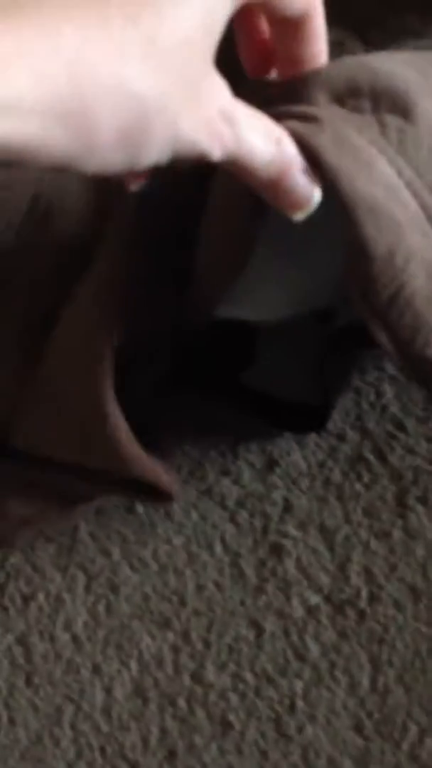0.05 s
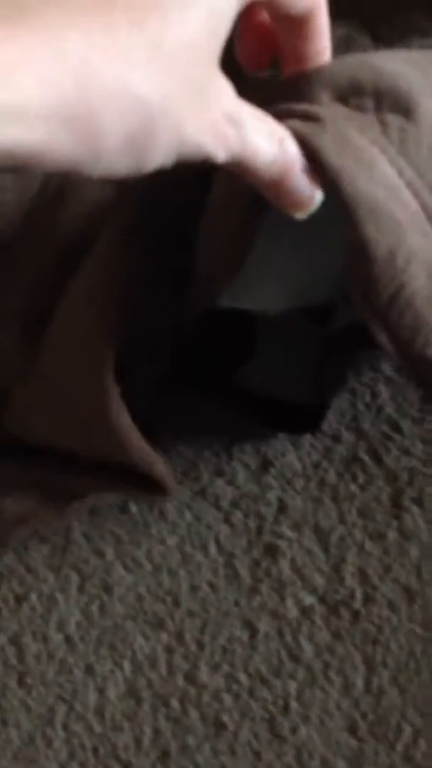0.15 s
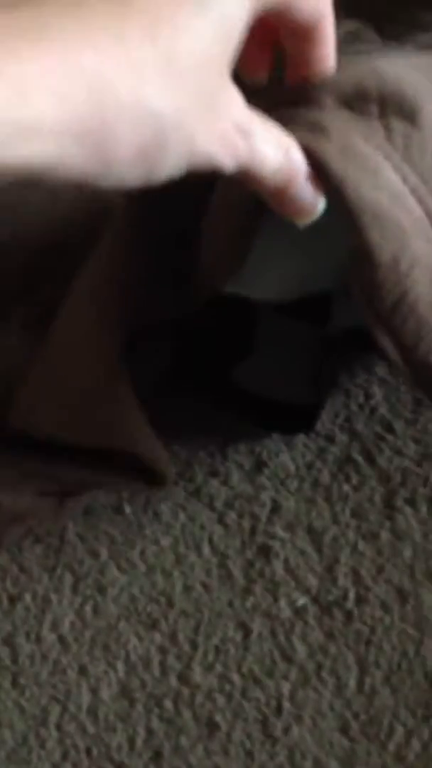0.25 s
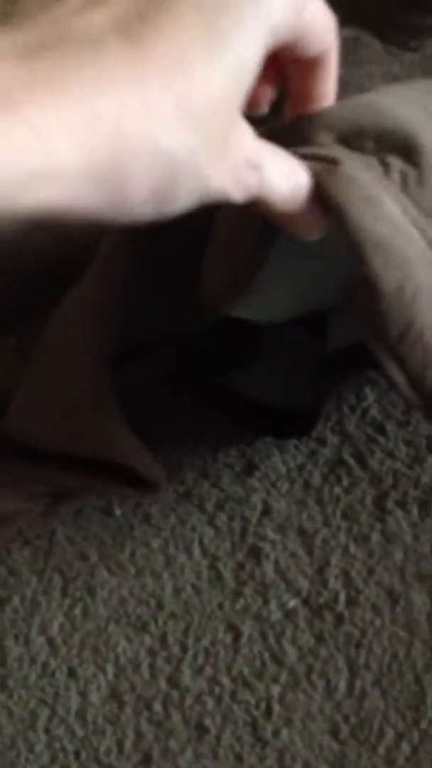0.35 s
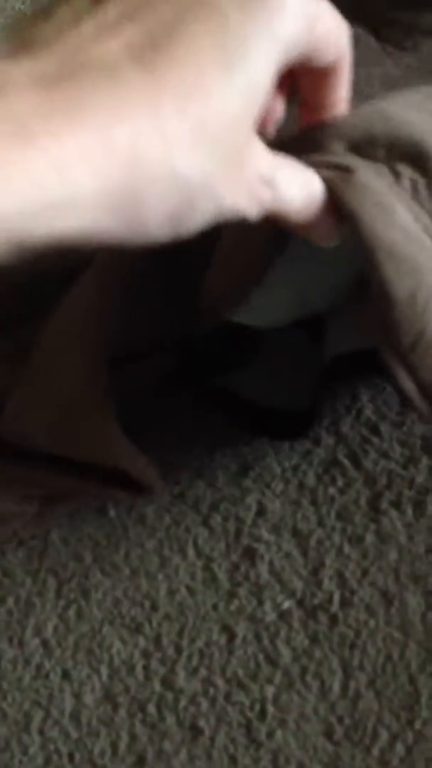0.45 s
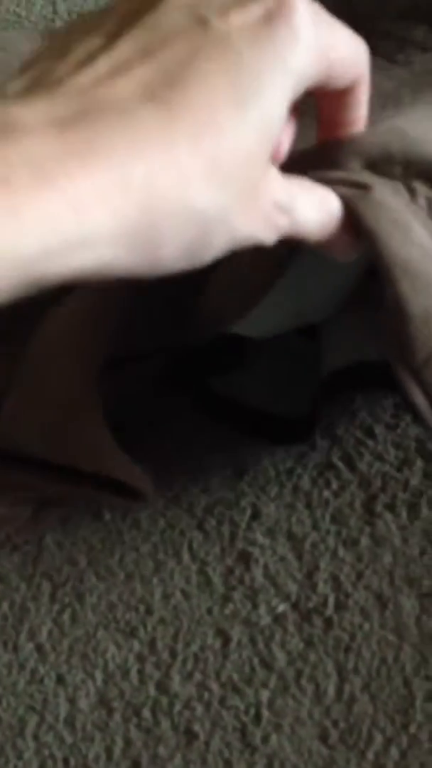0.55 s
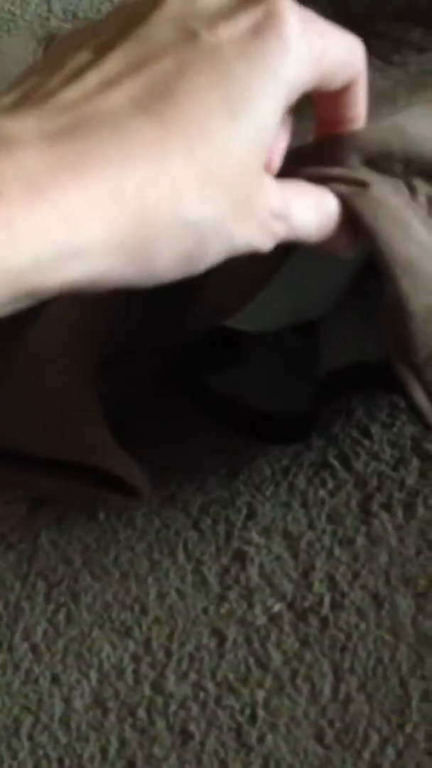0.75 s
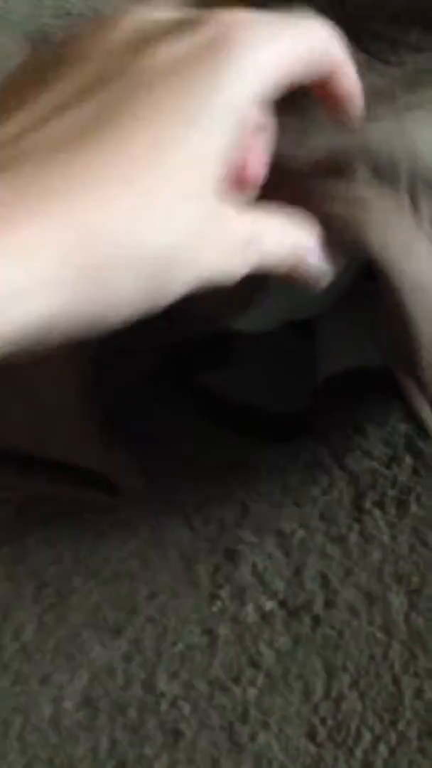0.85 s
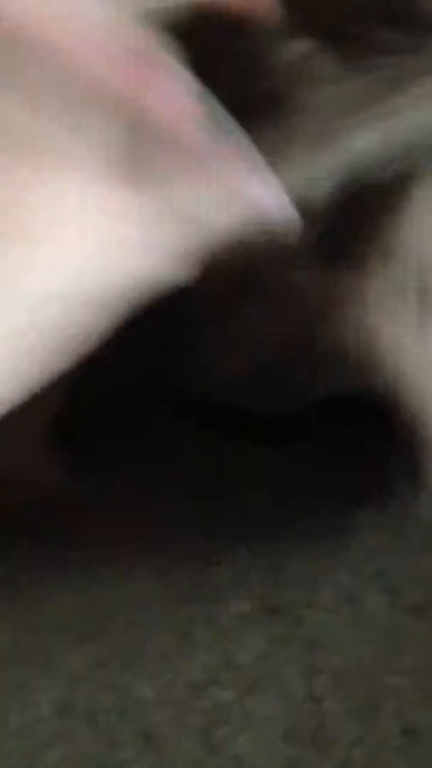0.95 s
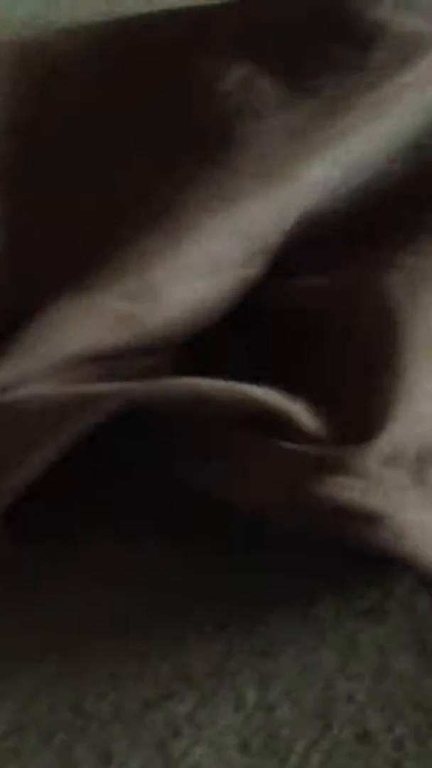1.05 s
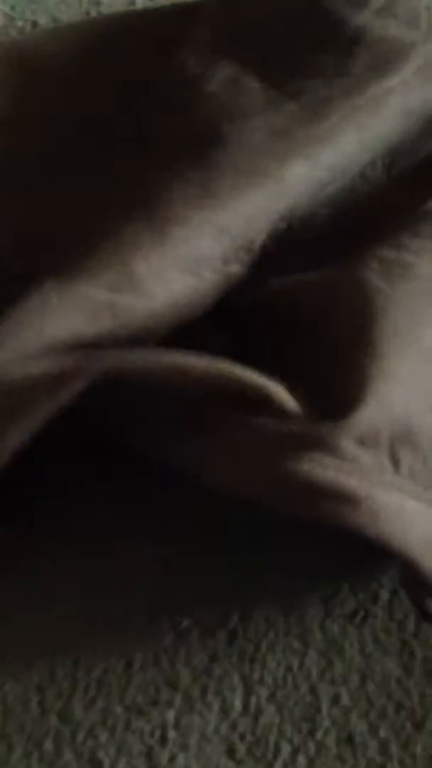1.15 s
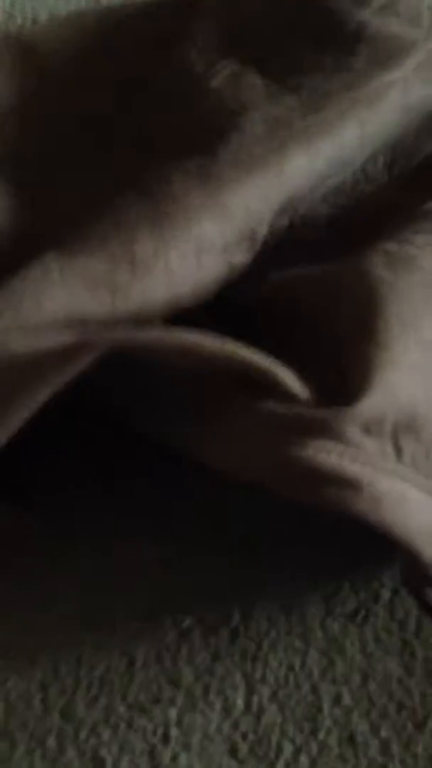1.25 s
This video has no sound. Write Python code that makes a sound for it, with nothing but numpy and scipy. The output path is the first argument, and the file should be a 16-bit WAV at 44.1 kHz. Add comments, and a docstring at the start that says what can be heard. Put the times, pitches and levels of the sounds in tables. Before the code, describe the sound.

High, short cries from a small animal come one after another indoors, loudest at first, then fainter and raspier. Each rings slightly in the room, over soft padded thuds, a light cloth brush and a low hum.

```python
"""Small animal under a cloth

A ferret-like animal cries six times: a high, clean stack of harmonics, shaped by its throat,
that cracks upward or turns hoarse before it sinks away. The room rings after each cry.
Underneath lie soft bumps and thuds, thin squeaks, a brush of cloth, room tone and mains hum."""
import sys
import numpy as np
from scipy import signal
from scipy.fft import rfft, irfft
from scipy.io import wavfile

SR = 44100
rng = np.random.default_rng(int(sys.argv[2]) if len(sys.argv) > 2 else 0)


def to_wav(sig):
    """Store sig (one row per channel, or 1-D mono) as 16-bit WAV at the path in sys.argv[1].

    Samples outside -1..1 are clipped; the rate is SR.
    """
    pcm = np.clip(np.atleast_2d(sig), -1, 1) * 32767
    pcm = np.round(pcm).astype(np.int16)
    wavfile.write(sys.argv[1], SR, pcm.T)  # frames by channels


N = 57330
TIME = np.arange(N) / SR


def amp(db):
    """Decibels to gain."""
    return 10 ** (np.asarray(db) / 20)


def curve_at(points, hz):
    """Reads a curve along a log-frequency axis."""
    f, value = np.transpose(points)
    return np.interp(np.log(hz + 1), np.log(f + 1), value)


def noise(eq):
    """White noise coloured by the gain eq(f), at an rms of one."""
    x = irfft(rfft(rng.standard_normal(N)) * eq(np.fft.rfftfreq(N, 1 / SR)), N)
    return x / np.sqrt(np.mean(x ** 2) + 1e-20)


def noise_band(centre_hz, octaves):
    """Noise through a bell-shaped band."""
    return noise(lambda f: np.exp(-.5 * (np.log2((f + 1) / centre_hz) / octaves) ** 2))


def wobble(rate_hz):
    """A random modulator that rolls off above the given rate."""
    return noise(lambda f: np.exp(-.5 * (f / rate_hz) ** 2))


def swell(start, length):
    """A half-sine fade in and out."""
    return np.sin(np.pi * np.clip((TIME - start) / length, 0, 1))


def padded_hits(hits, decay_s, octaves, attack_s=0.0019):
    """Cushioned blows: each a fast-damped burst of noise around one pitch."""
    out = np.zeros(N)
    for start, db, hz in hits:
        age = np.maximum(TIME - start, 0)
        envelope = np.minimum(age / attack_s, 1) * np.exp(-np.maximum(age - attack_s, 0) / decay_s)
        out += amp(db) * noise_band(hz, octaves) * envelope
    return out


# Room tone EQ: f/Hz, relative level/dB
ROOM_TONE_EQ = [(15, -52), (30, -14), (50, -11), (75, -1.5), (150, -2), (230, -5.5), (380, -9.5),
                (520, -13), (850, -15), (1200, -17.5), (2100, -22.5), (2900, -17), (3260, -21.5),
                (4260, -19.5), (7500, -24.5), (15000, -29.5)]

def room_tone(bed_db=-60, hum_db=-57, hum_hz=120):
    """A steady, bass-heavy noise bed with mains hum."""
    bed = noise(lambda f: amp(curve_at(ROOM_TONE_EQ, f)))
    hum = np.sqrt(2) * np.sin(2 * np.pi * hum_hz * TIME)
    return amp(bed_db) * bed + amp(hum_db) * hum


# Thud cues: t/s, level/dB, f/Hz
THUD_CUES = [(0.0, -45.5, 265), (.165, -54, 297), (.235, -56.5, 362), (.306, -44.5, 353),
             (.512, -54.5, 359), (.783, -54.5, 345), (.918, -50.5, 314), (1.116, -47, 302)]

def thuds():
    """Dull, padded blows in the low mids."""
    return padded_hits(THUD_CUES, decay_s=0.0085, octaves=0.32)


# Squeak cues: t/s, length/s, level/dB, start f/Hz, end f/Hz
SQUEAK_CUES = [(.005, 0.055, -63.5, 3170, 3330), (0.103, 0.043, -60, 3650, 3900),
               (0.22, 0.029, -50.5, 2310, 2480)]

def squeaks(waver=0.03, waver_hz=200):
    """Faint, wavering whistles that glide upward and lead into the first cry."""
    out = np.zeros(N)
    for start, length, db, from_hz, to_hz in SQUEAK_CUES:
        glide = np.interp(TIME, [start, start + length], [from_hz, to_hz])
        hz = glide * (1 + waver * wobble(waver_hz))
        out += amp(db) * swell(start, length) * np.sin(2 * np.pi * np.cumsum(hz) / SR)
    return out


# Cloth cue: t/s, length/s, level/dB, centre f/Hz, width/octaves
CLOTH_CUES = [(0.093, 0.046, -60, 5300, 0.28)]

def cloth():
    """Cloth slides with a short, soft hiss."""
    return sum(amp(db) * swell(start, length) ** 2 * noise_band(hz, octaves)
               for start, length, db, hz, octaves in CLOTH_CUES)


# Bump cues: t/s, level/dB, f/Hz
BUMP_CUES = [(.156, -53, 830), (.170, -54.5, 730), (.262, -45, 777), (.303, -56, 690), (.510, -55, 826),
             (.774, -46.5, 750), (.786, -52.5, 840), (.911, -40.5, 794), (.919, -45.5, 910),
             (1.107, -47.5, 726)]

def bumps():
    """Soft blows, higher and a little longer than the thuds."""
    return padded_hits(BUMP_CUES, decay_s=0.013, octaves=0.22)


# Formants of throat and mouth: f/Hz, gain/dB
THROAT_EQ = [(600, -48), (980, -39), (1220, -6.5), (1700, -11), (1950, -22), (2370, -0.5), (2800, 3),
             (3400, -4), (3650, -6.5), (3950, -0.5), (4300, -7.5), (4550, -5), (4950, -10), (5350, -12),
             (5950, -21), (6400, -19.5), (7300, -19), (8000, -31.5), (9300, -28), (10800, -32),
             (12000, -42), (15500, -47)]
# Automation, one list of breakpoints per cry:
# t/s, pitch/Hz, pre-EQ level/dB, fundamental lift/dB, treble lift/dB, edge lift/dB, roughness/0-1
CRY_CURVES = [
    [(.234, 1180, -32, 5.5, -15, -24, 0.08), (.245, 1200, -29, 0, 1.5, -2.5, 0.1),
     (.268, 1241, -30.5, -0.5, -0.5, 9, 0.06), (.285, 1219, -32.5, 2.5, -2, 5.5, 0),
     (.304, 1301, -31.5, 0, 5, 6, 0.1), (.315, 1431, -34.5, 11, 10, 11.5, 0),
     (.324, 1433, -28.5, -0.5, 8, 6.5, 0.1), (.335, 1383, -25.5, -2.5, 8, 6, 0.13),
     (.338, 1481, -25.5, 1.5, 6, 7, 0), (.347, 1639, -25.5, 6.5, -3.5, 0, 0.41),
     (.354, 1758, -20.5, 5.5, 0.5, 0.5, 0.24), (.360, 1636, -26.5, -13, -11, -15, 0.05),
     (.366, 1330, -41, 3, -22, -1, 0)],
    [(.454, 1289, -27, -11, 0, -1, 0.1), (.460, 1223, -26.5, -9, 14, -5.5, 0.07),
     (.467, 1278, -23.5, -8.5, 3.5, 3, 0), (.473, 1405, -24.5, -5, 1, -3, 0.36),
     (.477, 1413, -21.5, -10, -11, -7.5, 0.08), (.485, 1324, -24, -10, 0.5, 3.5, 0),
     (.5125, 1292, -22, -16, 4, -8.5, 0.03), (.515, 1687, -21.5, 2, -7, -11, 0.17),
     (.522, 1676, -14.5, -6.5, -4.5, -18, 0.07), (.536, 1643, -20, -15, -19, -17, 0),
     (.546, 1330, -50, 14, -7, 0, 0.3)],
    [(.627, 1205, -31, -12, -9, -7, 0.04), (.636, 1171, -22, -8, -16, -19.5, 0),
     (.645, 1190, -37.5, 3.5, -2, 6, 0), (.649, 1520, -31.5, -7, -9, -8, 0.45),
     (.657, 1520, -39.5, -10, -3, 2, 0.04), (.665, 1354, -47, 15.5, -23, 5, 0.26),
     (.676, 1205, -47.5, 1, 6, 4, 0.6)],
    [(.789, 1261, -32, -6, -8, -14, 0.18), (.801, 1224, -35, -38, 8.5, -25, 0),
     (.812, 1241, -30, -7, 1.5, -14, 0), (.823, 1324, -32, -11.5, -8.5, -9, 0.08),
     (.837, 1240, -34, -8.5, 0, -10, 0.07), (.856, 1363, -32, -1, -2, -3.5, .05),
     (.873, 1333, -37, -5.5, 5, -1, 0.17), (.883, 1492, -37.5, 7.5, 2, -8, 0.21),
     (.897, 1395, -37, -6.5, -2, -15, 0.58), (.920, 1456, -42, 11, -4, -3, 0.34),
     (.938, 1489, -43, 2, -1.5, -1, 0), (.956, 1462, -37.5, 9.5, -3.5, -3, 0.09),
     (.968, 1409, -48, 8.5, 0, 5.5, 0.15), (.979, 1220, -51, 19, -3, -4, 0.4)],
    [(1.138, 1178, -34.5, 6.5, -6, -22, 0.29), (1.144, 1179, -32.5, -3, -4.5, -21, 0.11),
     (1.153, 1210, -42, 13, 3, -8, 0.14), (1.159, 1065, -51.5, 30, -8, 0, 0),
     (1.168, 900, -46, 39, -12, 3, 0.3)],
    [(1.293, 1385, -46, 12, 1, -4, .45), (1.305, 1360, -41.5, 9, -29, -12, 0.42)],
]

def cry(curve, attack_s=0.0011, release_s=0.0022):
    """Vocal folds sound harmonics through the throat; roughness shakes their pitch and strength."""
    times, *lanes = np.transpose(curve)
    on = (TIME >= times[0]) & (TIME <= times[-1])
    t = TIME[on]
    pitch, db, fundamental_db, treble_db, edge_db, rough = (np.interp(t, times, v) for v in lanes)
    jitter = (0.0034 + 0.068 * rough) * wobble(rate_hz=390)[on]
    phase = 2 * np.pi * np.cumsum(pitch * (1 + jitter)) / SR
    harmonic = np.arange(1, 14)[:, None]
    hz = harmonic * pitch
    # The treble band crossfades into a shrill edge, which rolls off over about an octave.
    treble = np.interp(hz, [2550, 4450, 4800, 5400], [0, 1, 1, 0])
    edge = np.interp(hz, [4800, 5400], [0, 1]) * np.exp(-.5 * np.log2(hz / 5400) ** 2)
    lift_db = fundamental_db * (harmonic == 1) + treble_db * treble + edge_db * edge
    gains = amp(curve_at(THROAT_EQ, hz) + lift_db) * (hz < SR / 2)
    shimmer = 0.58 * rough * wobble(rate_hz=586.8)[on]
    voice = np.sqrt(2) * (gains * np.sin(harmonic * phase)).sum(0) * (1 + shimmer)
    breath_gain = amp(-24) + amp(2.5) * rough ** 1.26  # a little air always, rasp when hoarse
    breath = breath_gain * noise(lambda f: amp(curve_at(THROAT_EQ, f)))[on]
    gate = np.clip((t - times[0]) / attack_s, 0, 1) * np.clip((times[-1] - t) / release_s, 0, 1)
    out = np.zeros(N)
    out[on] = (voice + breath) * amp(db) * gate
    low_cut = signal.butter(4, 860, "high", fs=SR, output="sos")  # a small mouth radiates few lows
    return signal.sosfilt(low_cut, out)


# Reflection taps: delay/s, level/dB
REFLECTION_TAPS = [(.0083, -20.5), (0.0136, -14), (0.0223, -27), (.033, -20), (0.046, -32.5)]

def early_reflections(x):
    """First bounces off floor, furniture and walls."""
    return sum(amp(db) * np.pad(x, (round(delay * SR), 0))[:N] for delay, db in REFLECTION_TAPS)


# Reverb time by band: f/Hz, T60/s
REVERB_TIMES = [(300, 0.13), (1300, 0.48), (2700, 0.36), (5000, 0.4), (12000, 0.27)]

def reverb(x, build_s=0.0047):
    """The room's diffuse tail, each band dying at its own speed."""
    hz, t, bands = signal.stft(rng.standard_normal(N), SR, nperseg=256)
    decay = amp(-60 * t / curve_at(REVERB_TIMES, hz)[:, None])
    fade_in = np.minimum(TIME / build_s, 1) ** 2
    tail = signal.istft(bands * decay, SR)[1][:N] * fade_in
    return signal.fftconvolve(x, tail / np.linalg.norm(tail))[:N]


def scene(reverb_db=-14):
    """Mono mix: cries and small movements in the room, over the room tone."""
    movements = thuds() + squeaks() + cloth() + bumps()
    direct = movements + sum(cry(curve) for curve in CRY_CURVES)
    return (room_tone() + direct + early_reflections(direct) + amp(reverb_db) * reverb(direct))[None]


def record(dry, cutoff_hz=15450):
    """A steep high cut on the whole mix."""
    high_cut = signal.firwin(511, cutoff_hz, window=("kaiser", 9), fs=SR)
    return signal.oaconvolve(dry, high_cut[None], "same")


dry = scene()
out = record(dry)
to_wav(out)
```